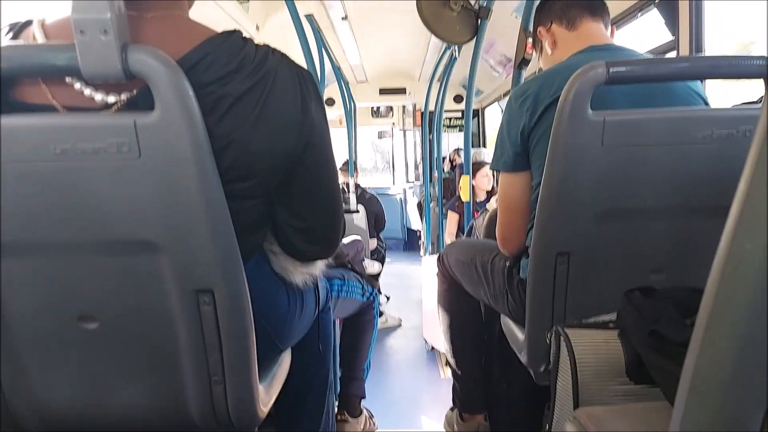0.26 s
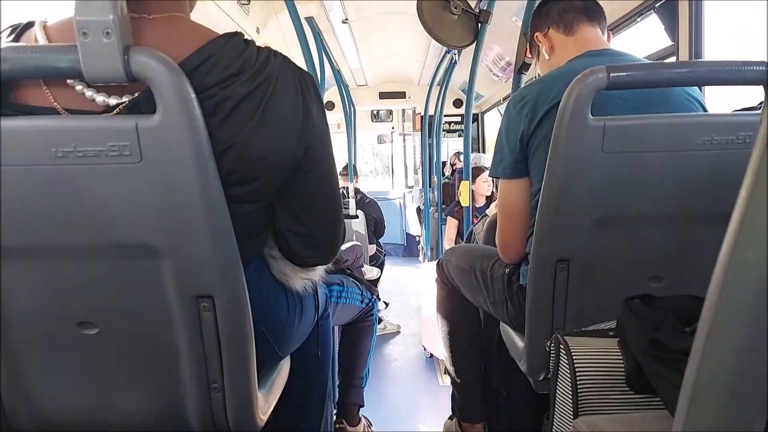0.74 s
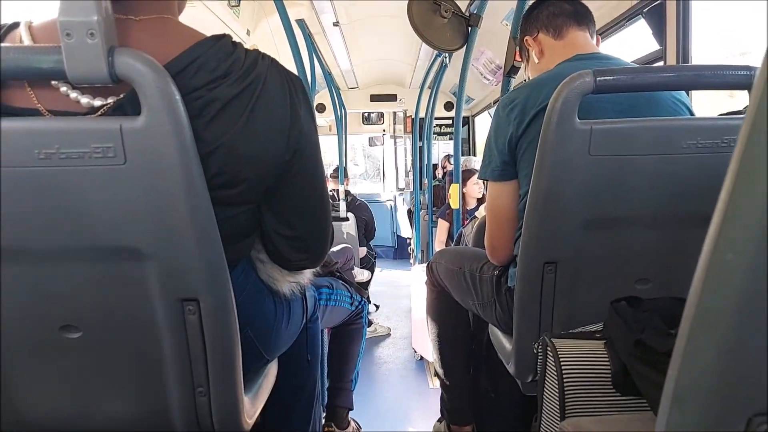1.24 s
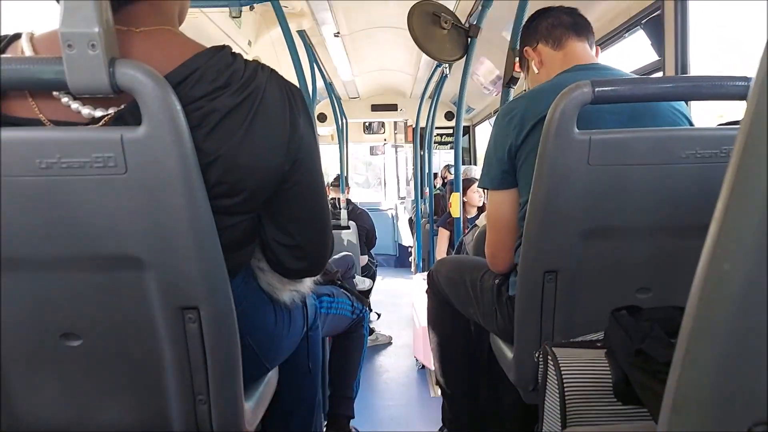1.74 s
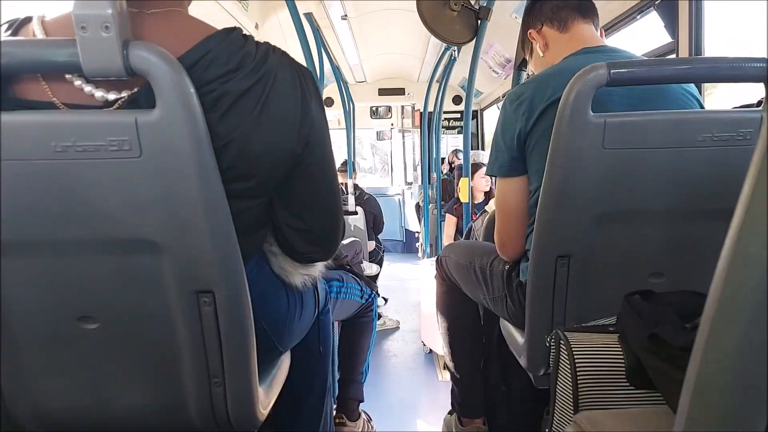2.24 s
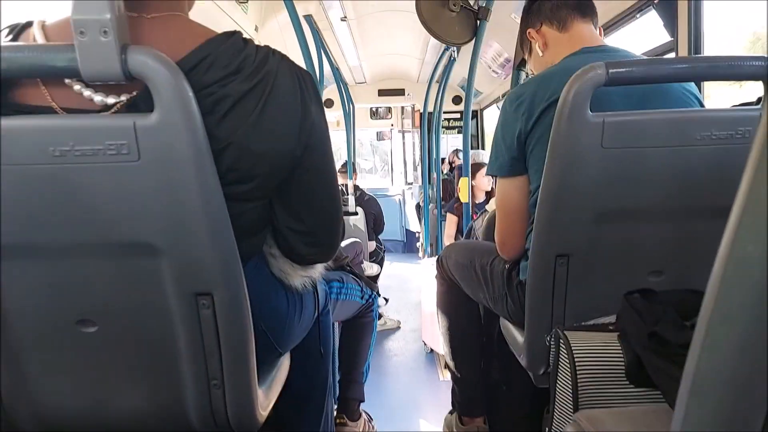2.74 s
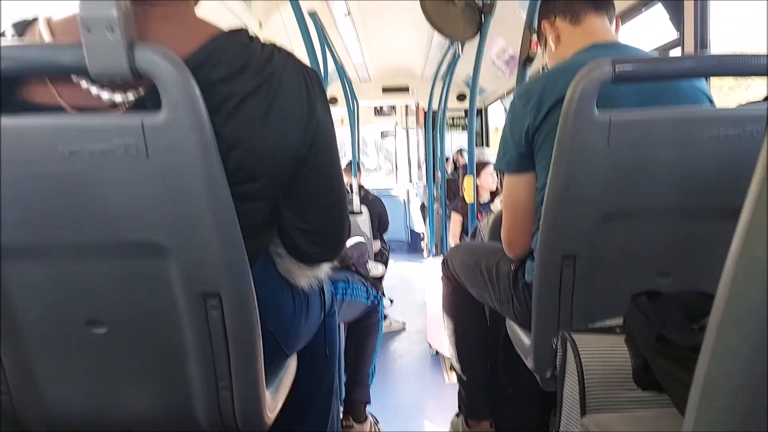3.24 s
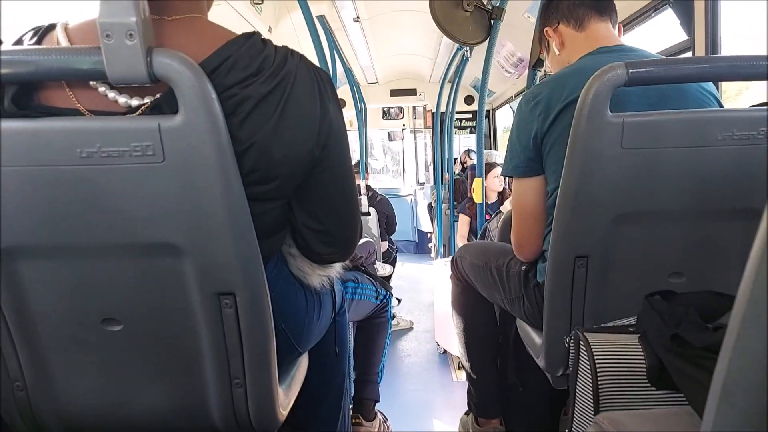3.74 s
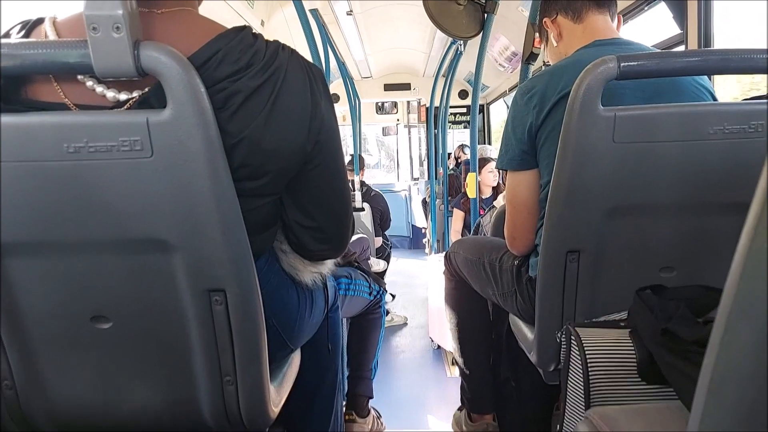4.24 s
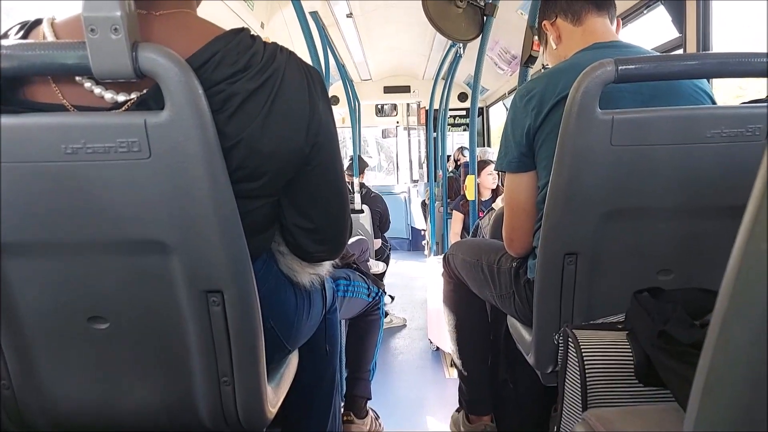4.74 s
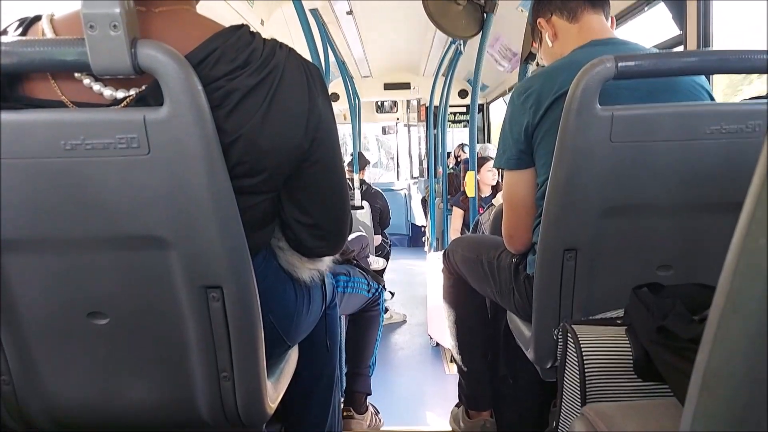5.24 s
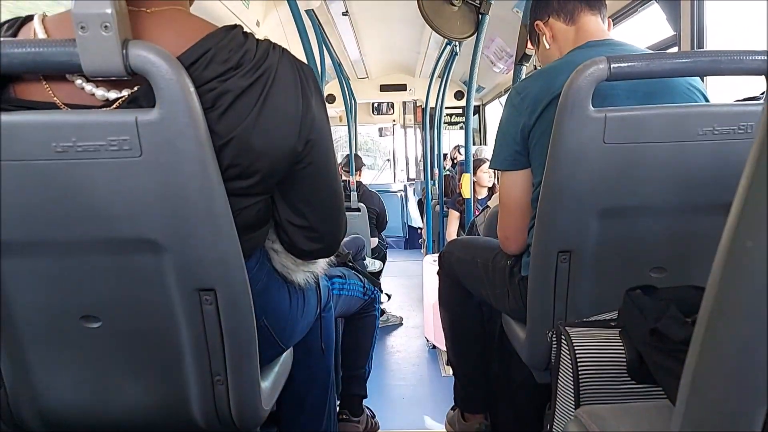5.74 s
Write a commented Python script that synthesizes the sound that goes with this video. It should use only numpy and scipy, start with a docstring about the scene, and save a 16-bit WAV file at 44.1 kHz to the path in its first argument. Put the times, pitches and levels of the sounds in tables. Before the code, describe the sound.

A bus rides along at constant speed, its low, throbbing diesel drone and tyre rumble filling the cabin around a rear seat. A run of low thuds shakes the trim into taps and rattles, followed by a single short knock. Around the middle come a short rustle, two tiny squeaks and a swell of passing traffic, before another run of bumps. Faint mechanical whines and a thin high whistle continue underneath.

```python
"""A six-cylinder diesel drones at a steady speed, heard inside a moving bus, with whines from its gears
and belt-driven parts. The road rumbles, bumps boom through the body and traffic outside swells midway.
Loose trim rattles, taps and clanks, and the metal fittings jingle lightly. There is one dull knock,
a brief rustle and two faint squeaks, and a thin whistle hangs high above it all."""
import sys
import numpy as np
from scipy import signal
from scipy.fft import rfft, irfft, next_fast_len
from scipy.io import wavfile
from scipy.ndimage import map_coordinates

SR = 44100
rng = np.random.default_rng(int(sys.argv[2]) if len(sys.argv) > 2 else 0)


def generate_wav(signal):
    """Clip the signal to [-1, 1] and save it as 16-bit WAV at the path in sys.argv[1]."""
    frames = np.transpose(np.atleast_2d(signal))
    scaled = np.clip(frames, -1, 1) * 32767
    pcm = np.round(scaled).astype(np.int16)
    wavfile.write(sys.argv[1], SR, pcm)


N = 264159

CRANK_HZ = 14.49
RATTLE_RISE_S, RATTLE_HOLD_S = 0.0025, 0.0076
# rattles of the trim: (time [s], relative level [dB], extra treble of a hard contact [dB])
RATTLE_HITS = [(0.364, -31.5, 1), (0.419, -34, 3), (0.599, -32, -1), (0.69, -34, 0), (0.75, -30.5, 3),
               (0.78, -27.5, 1), (1.018, -38, 7), (1.063, -32, 3), (1.175, -30, -3), (2.752, -30, 5),
               (2.78, -24, -8), (2.9, -28, -4), (2.955, -25, -7), (3.35, -30, 2), (3.446, -24.5, -1.5),
               (3.469, -30, 0), (3.505, -26.5, 3), (3.598, -29, -5), (3.682, -30, -1), (3.778, -30, 0),
               (3.84, -36, 1), (4.005, -38, 6), (4.09, -36, 1), (4.184, -33, 0), (4.375, -36, 4),
               (4.55, -34, 1), (5.064, -32, 3), (5.135, -33, -1), (5.389, -30, -2), (5.862, -28, 0)]
# colour of the chattering trim: (frequency [Hz], relative level [dB])
TRIM_SPECTRUM = [(800, -14), (1900, 4), (2550, 8.5), (3200, 0.5), (4200, 6.5), (5800, -4.5), (7500, -12),
                 (10500, -8.5), (15500, -20)]
# resonances of the metal rails and fittings: (frequency [Hz], boost [dB])
FITTING_MODES = [(2765, 4), (3130, 3), (3528, 6), (3948, 5), (5330, 4), (5976, 8), (6641, 9), (7332, 9),
                 (8030, 7), (8775, 9), (9581, 9), (10390, 10), (11195, 8), (12060, 7)]


def amp(db):
    """Decibels to gain."""
    return 10 ** (np.asarray(db) / 20)


def unit(x):
    """Scaled to rms 1."""
    return x / np.sqrt(np.mean(x ** 2) + 1e-20)


def along(points, hz):
    """(frequency [Hz], value) points read on a log axis."""
    freqs, values = np.transpose(points)
    return np.interp(np.log(hz + 1), np.log(freqs + 1), values)


def fader(points):
    """(time [s], level [dB]) points joined into one level per sample."""
    return np.interp(np.arange(N) / SR, *np.transpose(points))


def wobble(rate, steps=6):
    """A smooth random curve, rate knots a second."""
    knots = rng.standard_normal(int(N * rate / SR) + 4)
    fine = np.arange(len(knots) * steps - steps) / steps
    return np.interp(np.arange(N) * rate / SR, fine, map_coordinates(knots, [fine]))


def burst(start, rise, hold, t60):
    """An envelope that rises, holds and dies away; times in seconds."""
    t = np.arange(N) / SR - start
    release = np.clip((t - rise - hold) / t60, 0, 2)
    return np.clip(t / rise, 0, 1) * amp(-60 * release)


def filtered(x, response):
    """x shaped by a gain that depends on frequency."""
    size = next_fast_len(N + SR // 4)
    return irfft(rfft(x, size) * response(np.fft.rfftfreq(size, 1 / SR)), size)[..., :N]


def angle(hz):
    """Running phase of a frequency curve."""
    return 2 * np.pi * np.cumsum(hz) / SR


def tone(phase, pan_db, lead):
    """A stereo sine of rms 1; standing waves put the left pan_db louder and lead radians ahead."""
    sides = np.array([[.5], [-.5]])
    return unit(amp(sides * pan_db) * np.sin(phase + sides * lead + 2 * np.pi * rng.random()))


def rush(spectrum):
    """Cabin noise of rms 1: alike on both sides in the bass, diffuse in the treble."""
    # likeness of the two sides: (frequency [Hz], correlation [-1 to 1])
    likeness = [(30, .97), (130, .93), (300, .82), (500, .5), (900, -.05), (2000, 0), (4000, -.1),
                (12000, 0)]
    # stereo balance: (frequency [Hz], left over right [dB])
    balance = [(30, 9), (85, 1), (140, 1), (210, 0.5), (330, 1), (500, 1), (800, 1.5), (1170, 1),
               (1750, 2.5), (2600, 4), (4200, -3.5), (6400, 3.5), (9800, 2.5), (14000, -3)]

    def response(hz):
        spread = np.arccos(np.clip(along(likeness, hz), -1, 1)) / 2
        mid, side = amp(along(spectrum, hz)) * [np.cos(spread), np.sin(spread)]
        lean = amp(along(balance, hz) / 2)
        return np.array([[mid * lean, side * lean], [mid / lean, -side / lean]])
    return unit(filtered(rng.standard_normal((2, N)), response).sum(axis=1))


def reflections(hz, depth_db, spacing_hz=20):
    """Reflections give each side its own ripple of peaks and dips, shallower in the bass."""
    knots = rng.standard_normal((2, 4096))
    ripple = np.array([np.interp(hz / spacing_hz, np.arange(len(side)), side) for side in knots])
    return amp(depth_db * np.clip(hz / 2500, 0, 1) * ripple)


def resonance(hz, centre_hz, width_hz):
    """Response of one ringing mode."""
    return 1 / (1 + 2j * (hz - centre_hz) / width_hz)


def metal(x, width_hz=24):
    """Sound passed through the narrow resonances of the fittings, and through the cabin."""
    def response(f):
        ring = 1 + sum((amp(db) - 1) * resonance(f, hz, width_hz) for hz, db in FITTING_MODES)
        return ring * reflections(f, depth_db=2)
    return filtered(x, response)


def road(rumble_db=-25.5, boom_db=-26.0, wash_db=-35.5, gust_db=0.54):
    """The chassis rumbles and the cabin booms under a wash of tyre and air noise."""
    # colours of the three beds: (frequency [Hz], relative level [dB])
    rumble = [(12, -24), (25, -17), (36, -19), (48, -1.5), (65, -4), (76, 9), (87, -11.5), (102, 3),
              (125, -9.5), (250, -70)]
    boom = [(70, -52), (100, -2.5), (120, -2), (136, 7.5), (165, -6.5), (192, 0), (215, -9), (300, -25),
            (600, -75)]
    air = [(400, -5.5), (800, 2.5), (1150, 3.5), (1450, -1), (2000, -2), (2600, 0.5), (3100, -9),
           (4300, -9.5), (5000, -13.5), (6000, -15), (7200, -25.5), (10000, -24.5), (13200, -26.5),
           (15500, -54)]
    wash = unit(filtered(rush(air), lambda f: reflections(f, depth_db=3)))
    low_end = amp(rumble_db) * rush(rumble) + amp(boom_db) * rush(boom)
    return low_end + amp(wash_db + gust_db * wobble(21.21)) * wash


def traffic(level_db=-33, nearest_s=3.23, half_power_s=0.71):
    """A roar of tyres outside swells and recedes as one over its distance."""
    # colour of the passing tyres: (frequency [Hz], relative level [dB])
    roar = [(200, -6), (300, -5), (480, -18), (800, 2), (1100, 1.5), (1600, 0), (2500, -4.5), (3200, -15.5),
            (5000, -18), (7200, -28.5), (15500, -38)]
    distance = np.hypot(1, (np.arange(N) / SR - nearest_s) / half_power_s)
    return amp(level_db) / distance * rush(roar)


def whistle(level_db=-53, pitch_hz=13805, sag_hz_per_s=22, waver_hz=17, skirt_hz=220, skirt_db=-4,
            flare_db=3.5, flare_s=.07, flutter_db=0.4, pan_db=-4):
    """A very high whistle that sinks slowly and flares now and then: a wavering core in a skirt of hiss."""
    # brief flares of the whistle: (time [s])
    flare_times = [1.19, 2.8, 3.51, 3.74, 5.46]
    t = np.arange(N) / SR
    phase = np.array([angle(pitch_hz - sag_hz_per_s * t + waver_hz * wobble(40)) for side in range(2)])
    # low-passed noise, shifted up to surround the pitch
    fuzz = unit(filtered(rng.standard_normal((2, 2, N)), lambda f: 1 / (1 + (f / skirt_hz) ** 2)))
    skirt = unit(fuzz[0] * np.cos(phase) + fuzz[1] * np.sin(phase))
    flares = sum(np.exp(-((t - s) / flare_s) ** 2) for s in flare_times)
    db = level_db + flare_db * flares + flutter_db * wobble(10) + np.array([[.5], [-.5]]) * pan_db
    return amp(db) * unit(unit(np.sin(phase)) + amp(skirt_db) * skirt)


def squeaks(half_length_s=0.011, waver=0.07):
    """Short, scratchy chirps, as of a seat frame rubbing."""
    # faint squeaks: (time [s], pitch [Hz], level [dB])
    chirps = [(3.15, 1030, -36.5), (3.235, 1026, -33)]
    t = np.arange(N) / SR
    out = np.zeros((2, N))
    for s, hz, db in chirps:
        envelope = amp(db) * np.exp(-((t - s) / half_length_s) ** 2)
        out += envelope * tone(angle(hz * (1 + waver * wobble(400))), pan_db=0, lead=0)
    return out


def knock(start_s=1.829, level_db=-21, pitch_hz=680, t60=.025):
    """A damped panel in the bodywork is struck once."""
    t = np.maximum(np.arange(N) / SR - start_s, 0)
    return amp(level_db - 60 * t / t60) * np.sin(2 * np.pi * pitch_hz * t)


def rustle(grain_db=1.0, jolt_db=1.3):
    """A short, grainy brushing sound in a few overlapping, jerky strokes."""
    # brushing strokes: (time [s], level [dB])
    strokes = [(2.742, -35.5), (2.835, -43), (2.885, -39), (2.94, -37.5), (3.015, -47)]
    # colour of the brushing: (frequency [Hz], relative level [dB])
    scrape = [(800, -20), (1800, -1), (2450, 5), (3150, -3), (3600, 3.5), (4100, 4.5), (4900, -1),
              (5450, -5), (5950, -2.5), (7200, -12), (8000, -8.5), (12500, -5.5), (15500, -10.5)]
    power = sum((amp(db) * burst(s, rise=0.0066, hold=0.048, t60=0.9)) ** 2 for s, db in strokes)
    brush = filtered(rush(scrape), lambda f: reflections(f, depth_db=2))
    grain = amp(grain_db * wobble(400) + jolt_db * wobble(70))
    return np.sqrt(power) * unit(grain * brush)


def jingle(idle_db=-65, shaken_db=-35, t60=1.5, width_hz=26, flutter_db=2):
    """The metal fittings shimmer faintly all the time and jingle on after each rattle."""
    def modes(f):
        return sum(amp(db) * resonance(f, hz, width_hz) ** 2 for hz, db in FITTING_MODES)
    ring = unit(filtered(rng.standard_normal((2, N)), modes))
    power = sum((amp(db + shaken_db) * burst(s, RATTLE_RISE_S, RATTLE_HOLD_S, t60)) ** 2
                for s, db, _ in RATTLE_HITS)
    return np.hypot(amp(idle_db), np.sqrt(power)) * amp(flutter_db * wobble(29)) * ring


def clanks(panel_hz=2500, width_hz=850):
    """Jolts shake a loose panel, which answers briefly in one broad resonance."""
    # jolts of the panel: (time [s], level [dB])
    jolts = [(0.599, -38), (0.778, -35), (1.185, -36), (2.778, -30), (2.953, -30.5), (3.35, -36),
             (3.779, -35)]
    ring = unit(filtered(rush(TRIM_SPECTRUM), lambda f: resonance(f, panel_hz, width_hz)))
    return ring * sum(amp(db) * burst(s, rise=0.0049, hold=0.0045, t60=0.089) for s, db in jolts)


def contacts(count=3, gain_db=-8.5, t60=.04, flight_s=.014, bounce_loss_db=4):
    """Each rattle starts with a hard tap of trim on metal, which bounces unevenly."""
    # colour of a hard contact: (frequency [Hz], relative level [dB])
    tap = [(800, -16), (2400, 5), (4200, 5.5), (7200, -10), (10000, -3.5), (13000, -6), (15500, -4)]
    t = np.arange(SR // 20) / SR
    power = np.zeros(N)
    for s, db, hard_db in RATTLE_HITS:
        flights = rng.uniform(.5, 1.5, count)
        landings = s + flight_s * (np.cumsum(flights) - flights[0])
        for bounce, at in enumerate(landings):
            peak_db = db + hard_db / 2 + gain_db - bounce * bounce_loss_db
            power[round(at * SR):][:len(t)] += amp(peak_db - 60 * t / t60) ** 2
    return metal(np.sqrt(power) * rush(tap))


def rattles(gain_db=-10, t60=0.24, chatter_db=1.0, treble_hz=6800, tick_count=30, tick_db=-43,
            tick_spread_db=3, buzz_db=-51, buzz_sway_db=2, shake=0.18):
    """Loose trim chatters in bursts, brighter on hard hits, ticks faintly and buzzes at the drone's rate."""
    tick_times = rng.random(tick_count) * N / SR
    tick_levels = tick_db + tick_spread_db * rng.standard_normal(tick_count)
    ticks = zip(tick_times, tick_levels, np.zeros(tick_count))
    # two envelopes: one for the body of the sound, one for its treble
    power = sum((amp([[db], [db + hard_db]]) * burst(s, RATTLE_RISE_S, RATTLE_HOLD_S, t60)) ** 2
                for s, db, hard_db in [*RATTLE_HITS, *ticks])
    pulse = np.cos(angle(np.full(N, 6 * CRANK_HZ)))
    buzz = amp(buzz_db + buzz_sway_db * wobble(9.9)) * (1 + shake * pulse)
    body_gain, treble_gain = np.hypot(amp(gain_db) * np.sqrt(power), buzz)
    chatter = unit(amp(chatter_db * wobble(500)) * rush(TRIM_SPECTRUM))
    body = filtered(chatter, lambda f: 1 / (1 + (f / treble_hz) ** 8))
    return metal(body_gain * body + treble_gain * (chatter - body))


def bumps(chassis_hz=45, cabin_hz=136, roof_hz=198, waver=.04):
    """Each bump rings the chassis, the air of the cabin and the roof, never at quite the same pitch."""
    # bumps in the road: (time [s], chassis thud [dB], cabin boom [dB], roof drum [dB])
    hits = [(0.02, -36, -25, -38), (0.255, -24, -18, -36), (0.465, -25, -17.5, -38), (0.695, -26, -21, -34),
            (0.915, -22, -17.5, -28), (1.17, -35, -23, -36), (1.77, -33, -26, -36), (3.765, -19, -28, -24),
            (3.975, -20, -21, -25), (4.175, -22, -20, -22.5), (4.445, -31, -22, -32), (4.84, -35, -25, -32),
            (5.71, -31, -25, -36)]
    # a wheel climbs the bump, rides it, and the body settles
    chassis, cabin, roof = sum(np.outer(amp(levels), burst(s, rise=0.027, hold=0.019, t60=0.22))
                               for s, *levels in hits)

    def ring(hz):
        return tone(angle(hz * (1 + waver * wobble(25))), pan_db=2, lead=.1)
    return chassis * ring(chassis_hz) + cabin * ring(cabin_hz) + roof * ring(roof_hz)


def whines(slip=0.00151, flutter_db=3.0, gear_hz=987.5, gear_waver_hz=2.44):
    """Belt-driven parts drift together as the belt slips; a gear sings beside them."""
    # pumps, fans and alternator: (pitch [Hz], level [dB], left over right [dB], left lead [rad])
    belt_parts = [(55.2, -37.5, 0, 0), (360.3, -44.5, 0, -.1), (657.8, -47, 6, -.1),
                  (799.3, -44.5, -1, -.7), (1599, -55, -1, .8)]
    # swells of the gear whine: (time [s], level [dB])
    gear_levels = [(0, -48), (1.0, -53), (2.3, -47), (2.9, -41), (3.3, -43.5), (4.3, -42.5), (5.2, -43),
                   (6, -44.5)]
    speed = 1 + slip * wobble(7)
    belt = sum(amp(db + flutter_db * wobble(12)) * tone(angle(hz * speed), pan_db, lead)
               for hz, db, pan_db, lead in belt_parts)
    gear_gain = amp(fader(gear_levels) + flutter_db * wobble(7.9))
    gear = tone(angle(gear_hz + gear_waver_hz * wobble(21.8)), pan_db=9.2, lead=-2.27)
    return belt + gear_gain * gear


def timing_gear(crank, teeth=54, flutter_db=1.4, backlash_rad=.2, rough_rad=.34):
    """Teeth mesh in step with the crank; their whine swells, and play makes it waver and rasp."""
    # swells of the timing gear's whine: (time [s], level [dB])
    levels = [(0, -38), (0.8, -38), (1.03, -34.5), (1.4, -37.5), (2.7, -37.5), (2.9, -32), (3.2, -37.5),
              (3.6, -38.5), (3.92, -34.5), (4.3, -38), (5.3, -37), (5.53, -34.5), (5.68, -38.5),
              (5.95, -35)]
    play = backlash_rad * wobble(12) + rough_rad * wobble(90)
    gain = amp(fader(levels) + flutter_db * wobble(14))
    return gain * tone(teeth * crank + play, pan_db=1, lead=.9)


def engine(creep_hz_per_s=.007, hunt=.0006, throb_db=.6, flutter_db=2.0, load_sway_db=.5,
           block_db=-29.0, clatter=0.18):
    """The diesel's tones share one slightly hunting crank; the drone throbs, block noise pulses with it."""
    # engine tones: (multiple of crank speed, level [dB], left over right [dB], left lead [rad])
    crank_orders = [(3, -32.5, .8, .1), (5.5, -36.5, 0, .1), (7, -38, 0, .1), (10.5, -42, 1, .1),
                    (12, -33, 3, .1), (15, -40, 3, .1), (16.5, -42, 4, .3), (18.5, -37.4, 0, -.2),
                    (19.5, -38.4, 0, .5), (22.5, -46.5, 2, -.1), (24, -42.2, 2, -.1), (27, -42.5, 3, -2.9),
                    (28.5, -49.5, -5, -.9), (30, -51.5, 5, .1), (31.5, -49, 9, .9), (33, -43.2, 4, -.1),
                    (36, -50, -4, 1.3), (37, -49, -2, 1.5), (39, -50, -3, 0), (42, -51, 0, 1.9),
                    (46.5, -50, 5, .2), (51, -47.5, -6, 1.7), (57, -51, -1, 1.7), (74, -50.5, 0, -.4),
                    (90, -54, 3, 1.1)]
    # swells and dips of the cabin drone: (time [s], level [dB])
    drone_levels = [(0.0, -15.5), (0.12, -16), (0.17, -22.5), (0.32, -15), (0.37, -21), (0.57, -14.5),
                    (0.63, -25), (0.68, -17.5), (1.18, -18.5), (1.22, -24), (1.28, -16), (1.93, -18),
                    (2.67, -16.5), (2.77, -25), (2.83, -20.5), (3.5, -21), (4.05, -17.5), (4.12, -23),
                    (4.4, -14), (4.44, -20.5), (4.9, -14), (4.95, -22), (4.99, -18.5), (5.79, -15.5),
                    (5.87, -23), (5.99, -14.5)]
    # colour of the engine block's noise: (frequency [Hz], relative level [dB])
    block_spectrum = [(120, -12), (220, -3), (345, 1), (400, -7), (640, -8), (830, -6), (1000, -16.5),
                      (1500, -33), (4000, -64)]
    speed_hz = CRANK_HZ + creep_hz_per_s * np.arange(N) / SR
    crank = angle(speed_hz * (1 + hunt * wobble(4.9)))
    beat = 6 * crank  # twice the firing rate
    drone = amp(fader(drone_levels) + throb_db * wobble(14)) * tone(beat, pan_db=.4, lead=0.27)
    block = amp(block_db) * rush(block_spectrum) * (1 + clatter * np.cos(beat))
    orders = sum(amp(db + flutter_db * wobble(9)) * tone(order * crank, pan_db, lead)
                 for order, db, pan_db, lead in crank_orders)
    return drone + timing_gear(crank) + amp(load_sway_db * wobble(12)) * (block + orders)


def scene():
    """Everything heard from a seat near the back."""
    ride = engine() + whines() + whistle() + road() + bumps() + traffic()
    return ride + rustle() + rattles() + contacts() + clanks() + jingle() + knock() + squeaks()


def record(dry):
    """A steep low-pass takes off everything above 15750 Hz."""
    return signal.sosfilt(signal.ellip(10, .1, 90, 15750, fs=SR, output="sos"), dry)


dry = scene()
out = record(dry)
generate_wav(out)
```